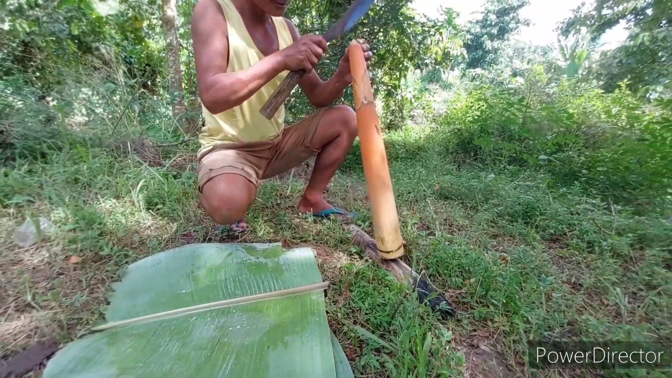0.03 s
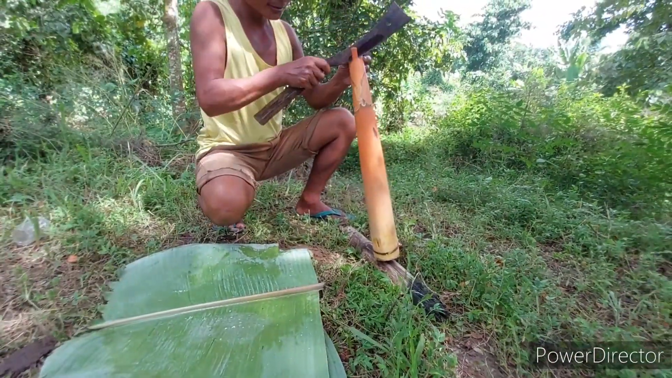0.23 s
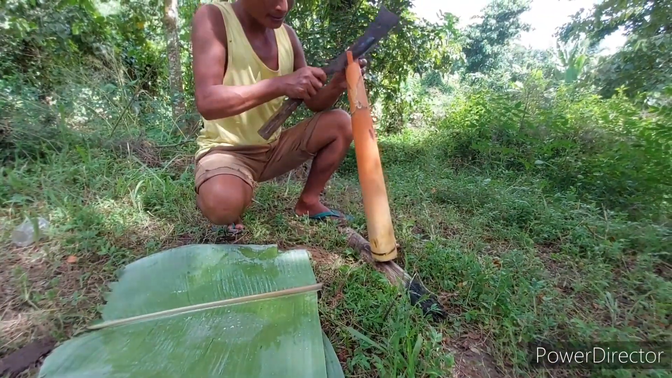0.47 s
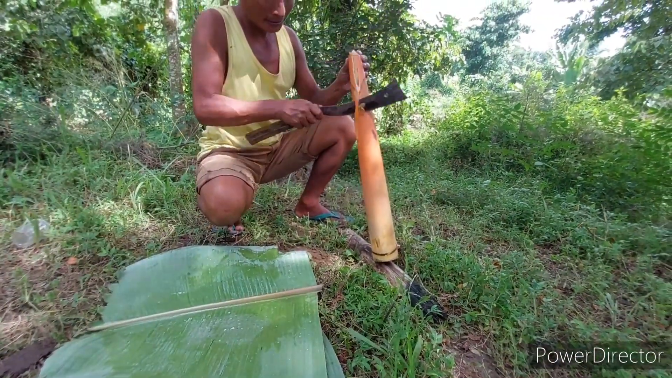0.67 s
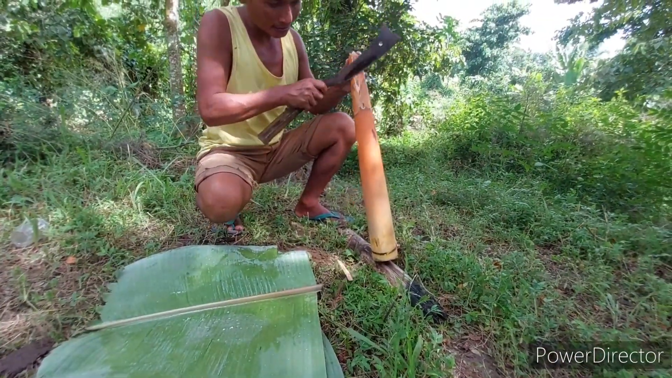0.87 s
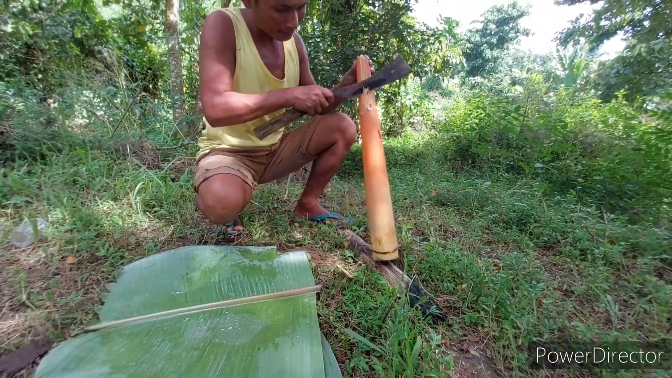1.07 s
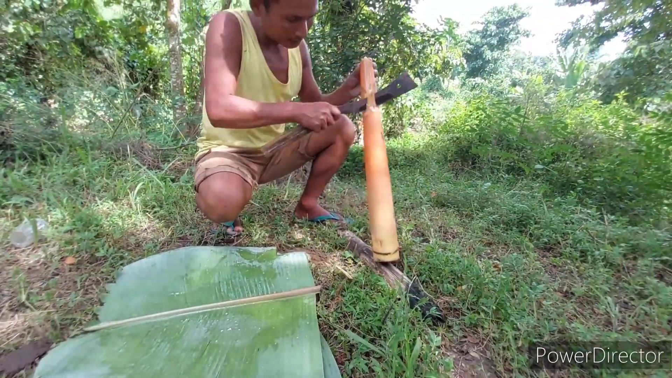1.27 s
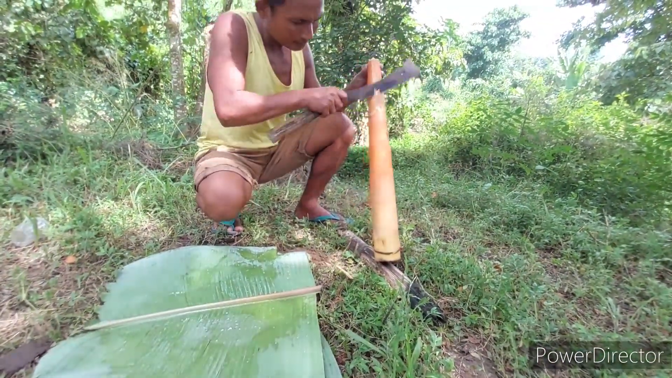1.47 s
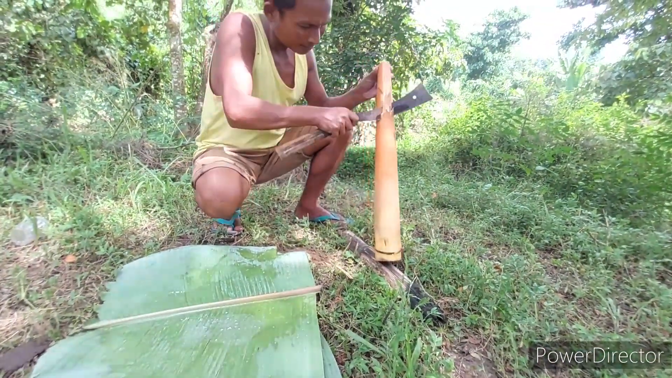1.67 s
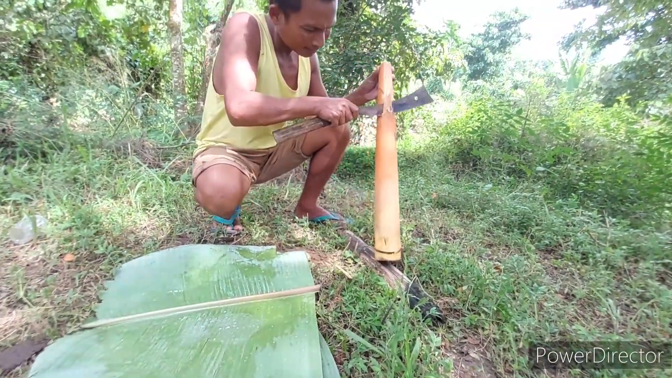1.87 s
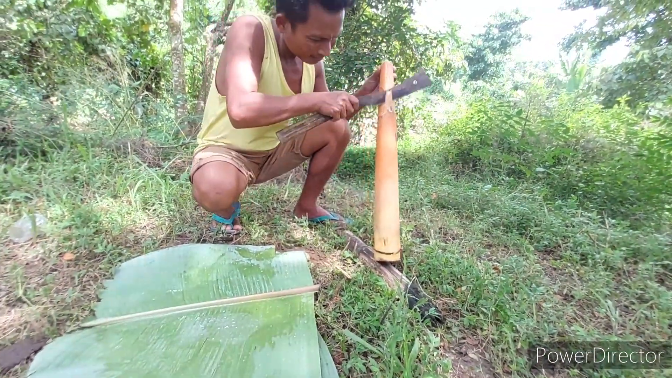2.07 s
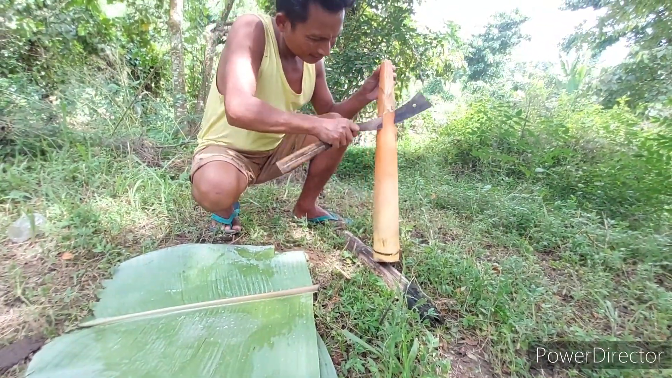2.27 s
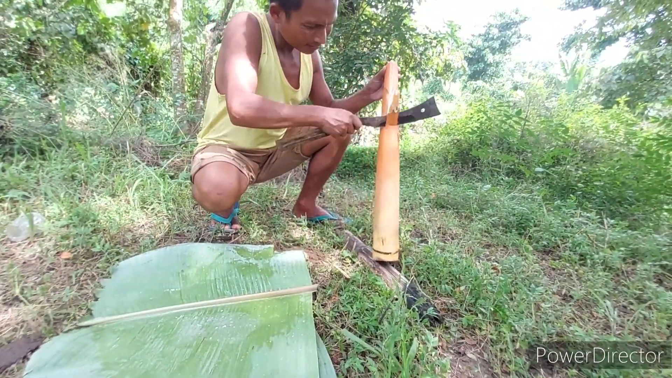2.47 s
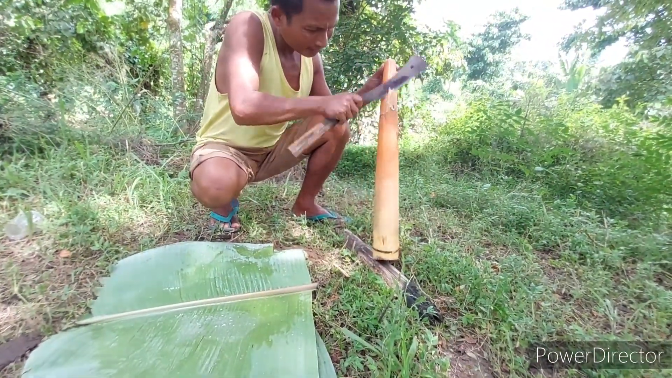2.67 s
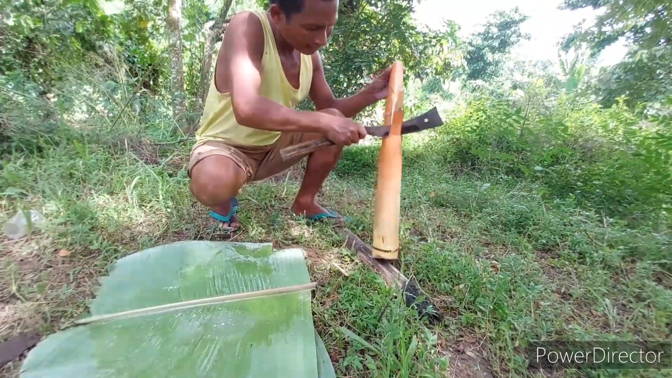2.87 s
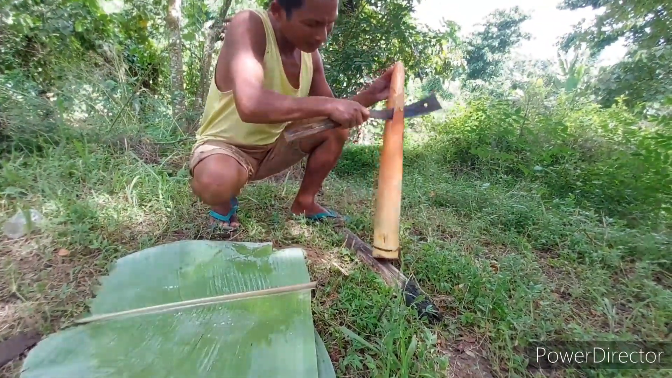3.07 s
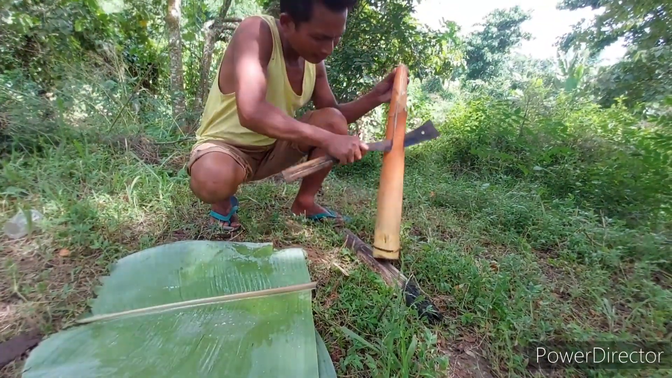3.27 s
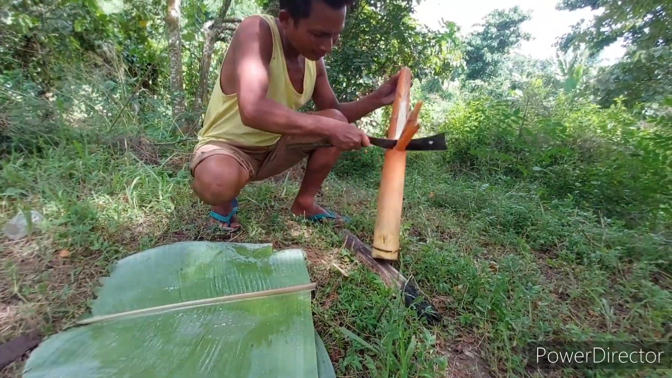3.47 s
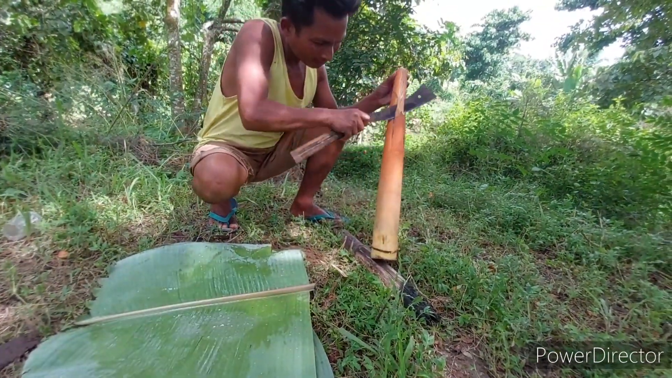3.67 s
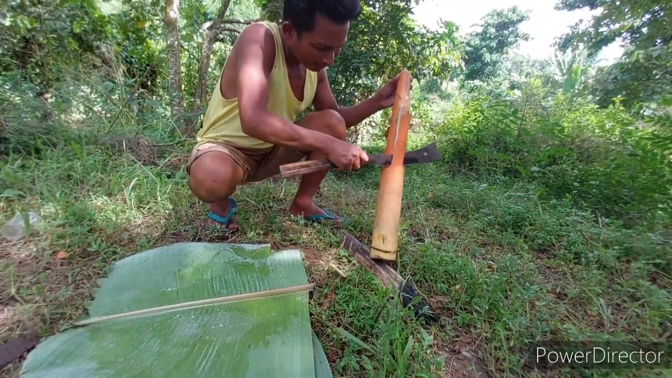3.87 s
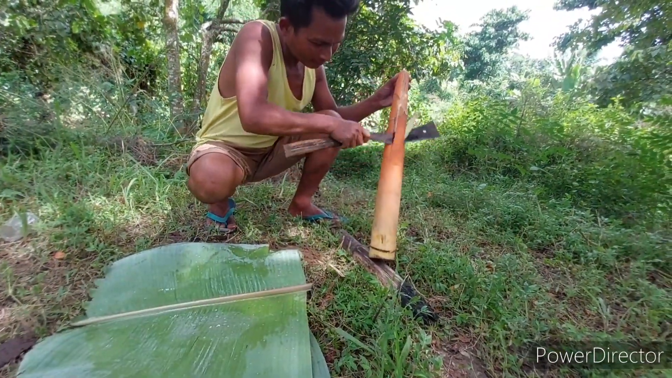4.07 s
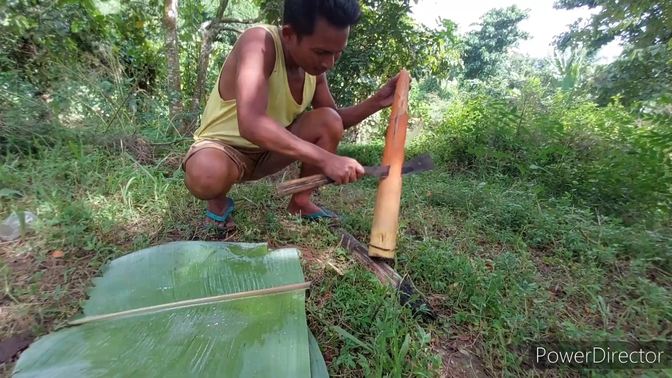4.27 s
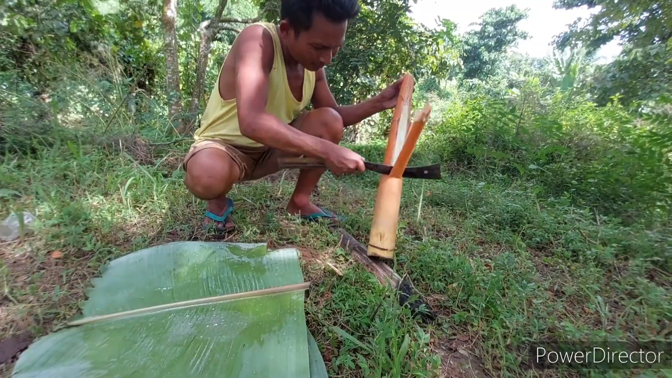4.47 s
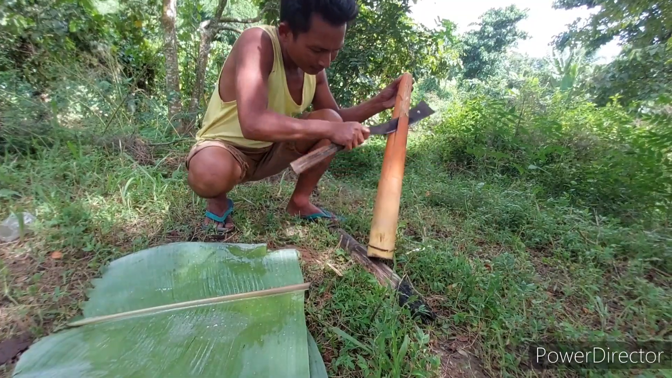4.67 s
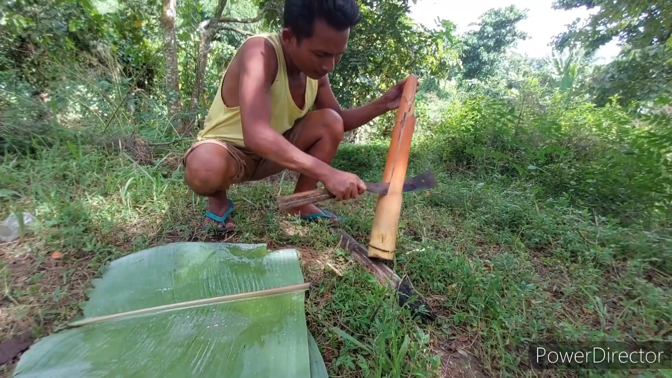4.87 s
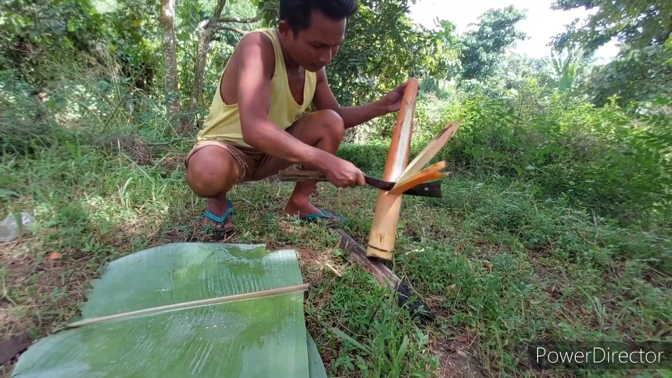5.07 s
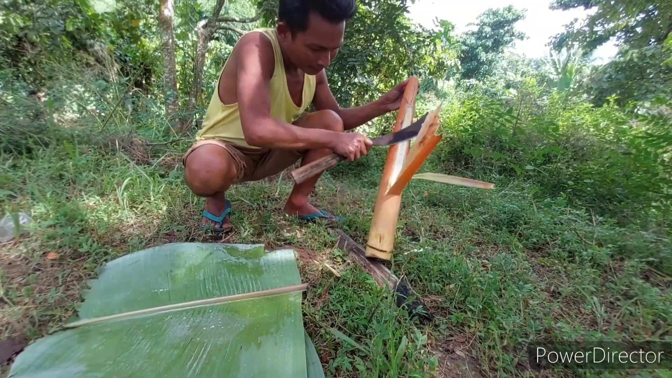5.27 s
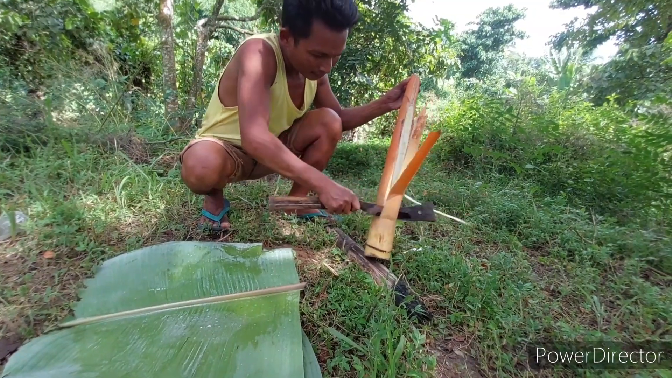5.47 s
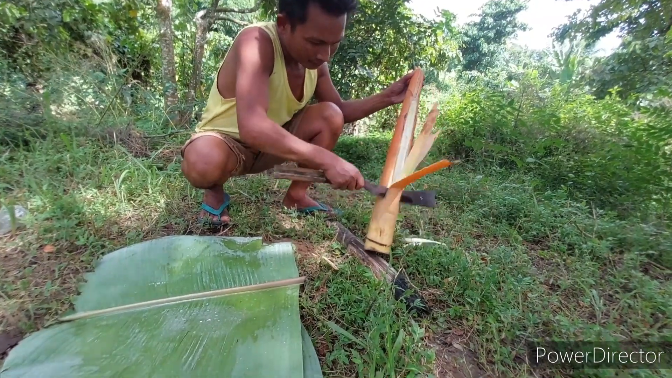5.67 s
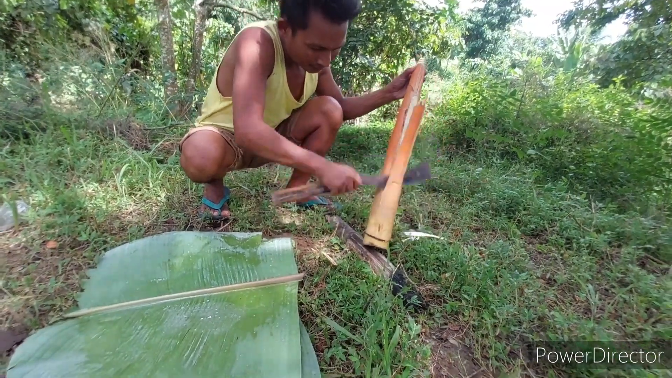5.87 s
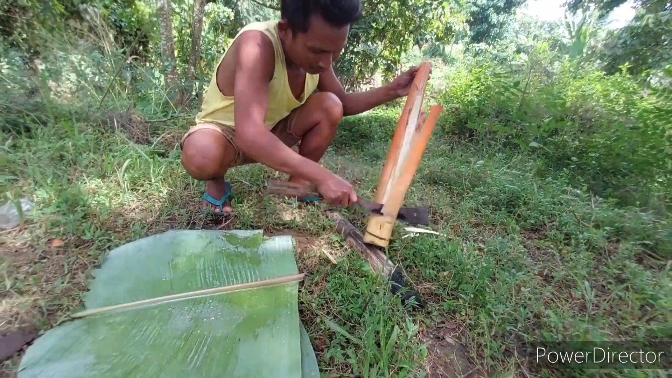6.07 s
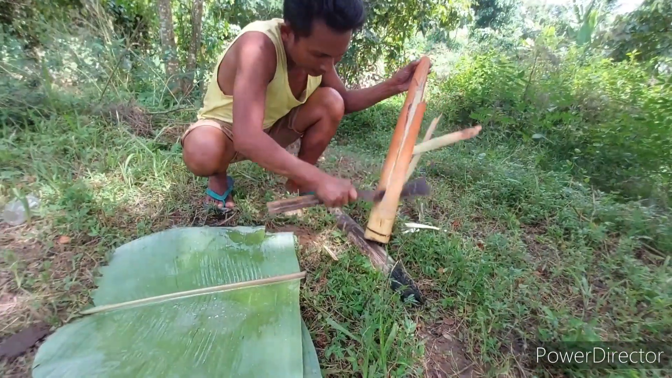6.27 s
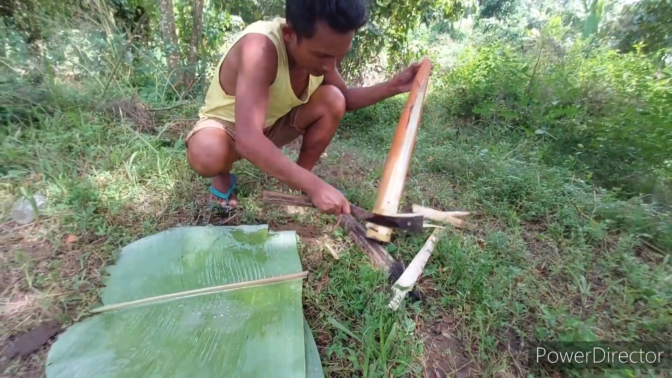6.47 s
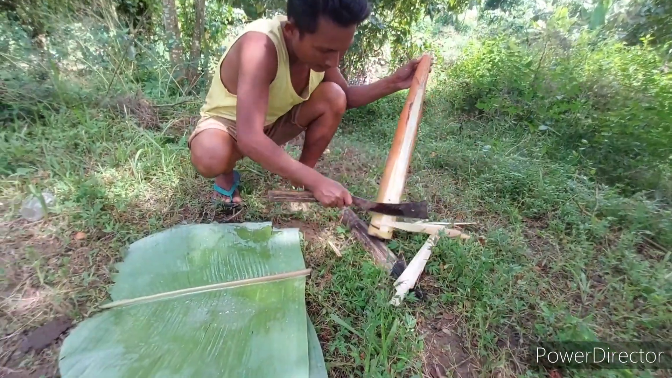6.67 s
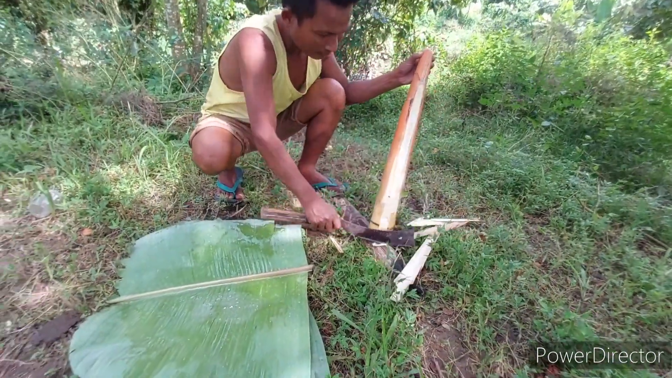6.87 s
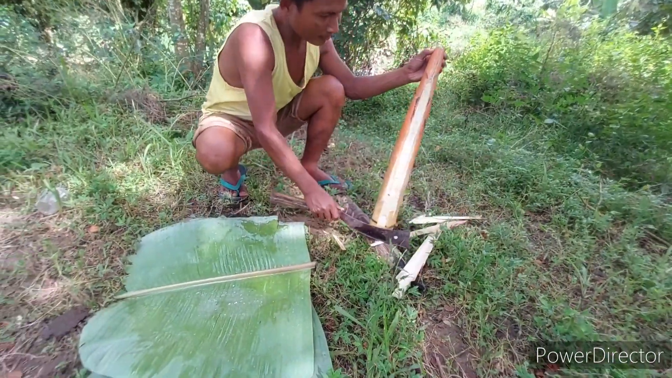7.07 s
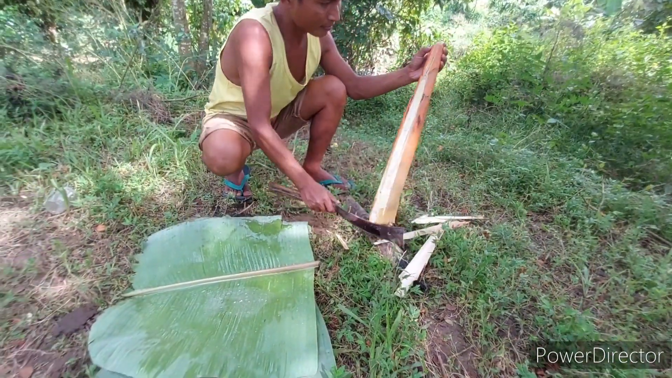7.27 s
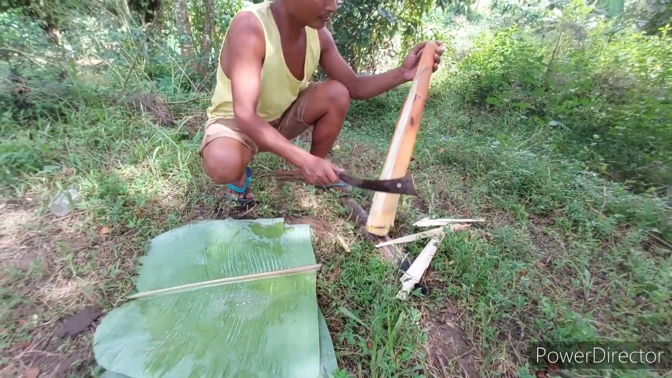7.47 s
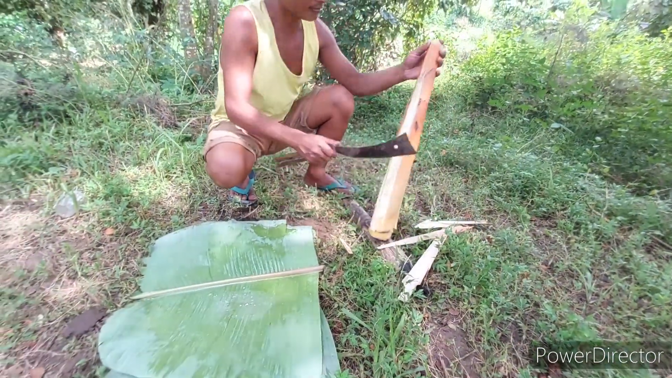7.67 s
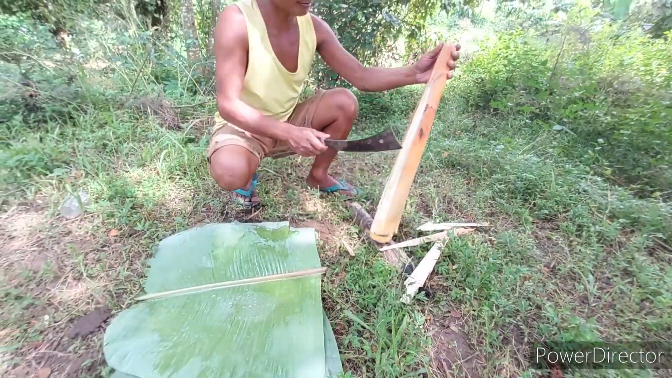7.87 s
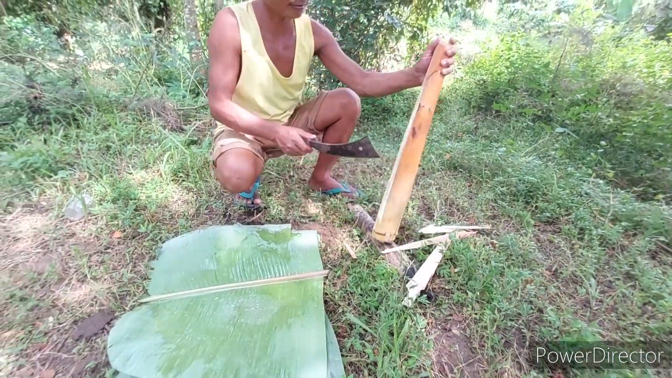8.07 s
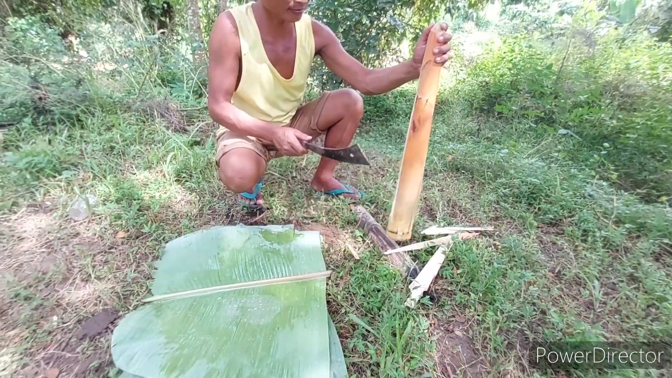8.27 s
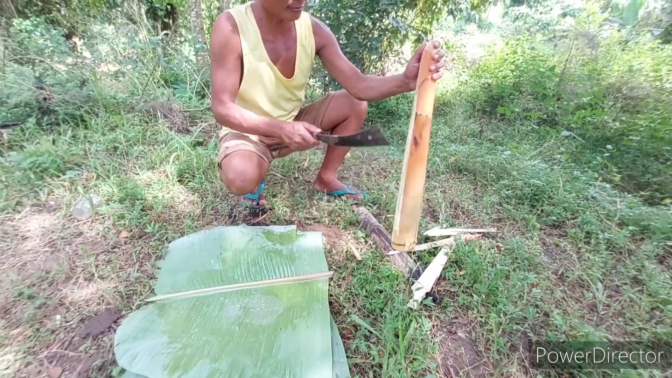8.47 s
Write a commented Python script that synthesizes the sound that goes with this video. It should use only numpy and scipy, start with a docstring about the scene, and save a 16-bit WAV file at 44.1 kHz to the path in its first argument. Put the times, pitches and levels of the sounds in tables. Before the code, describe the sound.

Quick tearing machete strokes shave a plant shoot, husk snapping between them, then two blunt knocks and sparse dry ticks above deep wavering rumble.

```python
"""A machete strips the husk from a raw bamboo shoot at the edge of a wood: grains of noise tear, strip and shoot ring.
Between strokes the blade levers the husk, which crackles in clumped clicks and sharp bursts as it splits.
Twice the blade knocks through at the foot, as a bank of damped sines; dry litter ticks between and after the knocks.
Behind it lie a low booming rumble, leaf hiss and stirred grass in filtered noise, and a few far birds in narrow noise.
Delayed, softened copies give the bounce off the soil, and scattered decaying noise gives the echo of the trees."""
import sys
import numpy as np
from scipy import signal
from scipy.fft import rfft, irfft
from scipy.io import wavfile
from scipy.ndimage import uniform_filter1d

SR = 44100
rng = np.random.default_rng(int(sys.argv[2]) if len(sys.argv) > 2 else 0)


def dump(signal):
    """Clip the signal to [-1, 1] and save it as 16-bit WAV at the path in sys.argv[1]."""
    limited = np.clip(np.atleast_2d(signal).T, -1, 1)
    pcm = np.round(limited * 32767).astype(np.int16)
    wavfile.write(sys.argv[1], SR, pcm)


N = 375291

# Event levels and spectra are relative: each layer sets its own trim, and colour() evens out a spectrum's energy.

# slow swell of the rumble: start_s, deep_level_db (below the split), upper_level_db
RUMBLE_LEVEL = [(0, -40, -41), (.45, -35, -39), (.8, -32.5, -39.5), (1.65, -23.5, -37), (2.05, -25, -38),
                (2.4, -24, -35), (3, -25.5, -33.5), (3.35, -20.5, -35), (4.05, -32.5, -36),
                (4.38, -22, -36), (4.95, -25.5, -40), (5.4, -29.5, -41.5), (6.4, -33, -44.5),
                (7.55, -38.5, -48), (8.25, -30, -47.5), (8.5, -34, -45)]
# the rumble brightens and dulls: start_s, top_level_db (270 to 400 Hz)
RUMBLE_TOP = [(0, -1), (.5, 5), (1.7, -0.5), (3, 0.5), (7.3, -3.5), (7.9, 3)]
# the rumble's hollow boom: start_s, centre_hz, strength_db
BOOM = [(0, 135, 0), (1.2, 130, 3), (1.6, 82, 3), (2.2, 80, 2), (2.9, 126, 4), (4.4, 138, 12),
        (4.95, 97, 14), (5.3, 78, 5), (6.5, 110, 1), (8.5, 128, -3)]
# the breeze in the leaves: start_s, hiss_level_db
HISS_LEVEL = [(0, -51.5), (1, -50), (1.9, -52), (2.75, -49), (3.25, -52), (4.65, -49.5), (5.3, -52),
              (6.8, -52), (8.2, -50)]
# far birds: start_s, length_s, pitch_hz, glide_share (pitch change over the call), level_db
BIRDS = [(0.133, 0.087, 2440, -.03, -54), (1.46, 0.028, 1600, -.02, -60), (7.255, 0.1, 2210, -.04, -55.5),
         (7.39, .1, 6400, 0, -59)]
# echo of the trees: frequency_hz, t60_s
TREE_DECAY = [(200, 0.3), (1000, 0.41), (3000, 0.29), (7000, 0.35), (15000, 0.15)]
# tone of what the trees throw back: frequency_hz, level_db
TREE_RETURNS = [(100, -22.5), (500, -11.5), (900, 1), (1400, -4), (3000, 0.5), (6000, -6), (9000, 2),
                (15000, 3)]
# a knock as it spreads in all directions, its modes blurred: frequency_hz, density_db (per Hz)
KNOCK_SPREAD = [(200, -14), (550, -3.5), (900, -0.5), (1500, -1), (2100, -8), (2800, -11), (6000, -15),
                (12000, -26)]

# tone of each noise: frequency_hz, density_db (per Hz)
RUMBLE_TONE = [(15, -41.5), (30, -32), (48, -3), (70, 5), (95, 4), (130, 3.5), (175, -6.5), (240, -12.5),
               (310, -22.5), (400, -37), (550, -48.5), (900, -67.5), (2000, -83.5)]
HISS_TONE = [(100, 22), (600, 1.5), (1200, -5), (2200, 2), (3000, -1.5), (4400, 4.5), (6000, 3.5),
             (7400, 0.5), (9000, -6.5), (11500, -3.5), (15000, -9), (16500, -4)]
TICK_TONE = [(500, -7), (2000, -14), (4000, -4), (7000, -5.5), (9000, -9.5), (12000, 2.5), (15500, -10.5)]
SNAP_TONE = [(300, -14.5), (1200, -21), (2500, -16), (4000, -6), (6000, 1), (7500, -4), (9000, -15),
             (12000, -6.5), (15500, -12)]
FLESH_TONE = [(150, -16), (550, -10), (850, -10), (1300, -6.5), (2000, 3.5), (3100, 2.5), (4500, -1),
              (8000, -22), (16000, -10)]
HUSK_TONE = [(200, -14.5), (550, -19), (1000, -24.5), (2000, -22.5), (3200, -6.5), (4600, -4), (5800, 2.5),
             (7400, -2.5), (8800, -14.5), (10500, -10.5), (12000, -7), (15000, -11.5), (16500, -24)]

# the shoot at two microphone ports, likeness: frequency_hz, likeness (0 to 1)
LIKENESS = [(300, 0.95), (1500, 0.89), (3000, 0.29), (7000, 0.35), (14000, .55)]
# balance of the ports: frequency_hz, left_minus_right_db
BALANCE = [(500, -1), (2000, -2), (3100, 3), (4000, -4), (4900, 1.5), (5900, -14.5), (7200, -2),
           (9500, -2.5), (12500, 0), (15000, -10)]
# phase by which the left port leads: frequency_hz, lead_rad
LEAD = [(500, 0.5), (2200, 0.86), (3000, -0.4), (4000, -1.7), (5500, -2), (7500, -0.1), (9500, 2.5),
        (12000, 1.5), (15000, 2.5)]
# the highest treble of the cutting brightens and dulls from stroke to stroke: start_s, highest_treble_db
FIZZ = [(.2, -2.5), (1.1, 2.5), (2.4, -1), (3.3, 2), (5.1, -1.5), (5.5, 4.5), (6.5, 4.5)]

# husk and dry stalks ticking on the ground: start_s, level_db
TICKS = [(6.7523, -41.5), (7.136, -43), (7.508, -32), (7.5177, -39.5), (8.0382, -38.5), (8.2721, -35.5),
         (8.3917, -38.5)]
# single snaps of the husk, strong and weak: start_s, level_db
SNAPS = [(1.5675, -36), (2.5265, -19.5), (3.0669, -32), (3.5842, -22), (4.057, -17.5), (4.0739, -24),
         (4.1995, -30), (4.6617, -27.5), (5.1232, -23), (5.2051, -31.5), (6.0614, -16.5)]
# the husk levered open: start_s, length_s, level_db
PRIES = [(2.538, .042, -44.5), (3, .085, -40), (3.515, 0.077, -39.5), (4.046, 0.06, -37.5),
         (4.135, .013, -37), (4.541, .074, -38.5), (5.088, .095, -40.5), (6.325, .04, -54)]
# the blade stops at the foot of the shoot: start_s, level_db, dull_hz (modes weaken above it),
# weight_db (for modes below 1200 Hz), favoured_hz (modes favoured by the spot struck), favour_db
KNOCKS = [(6.4824, -5.5, 2670, -1, 1124, 9), (6.9785, -12.5, 2450, -2, 1480, 6.5)]
# modes of shoot and block: frequency_hz, level_db, t60_s
SHOOT_MODES = [(150, -18, .04), (292, -9, 0.023), (441, -11.5, 0.077), (607, -1.5, 0.036), (930, -3, 0.029),
               (1143, -10.5, 0.017), (1220, -5, .02), (1464, -5, 0.011), (1780, -7.5, .024),
               (2010, -14, .024), (2670, -18, .018), (3360, -21, .018), (3780, -17, 0.031)]
# the last stroke wedges on through the woody foot: start_s, length_s, level_db
WEDGE = (6.453, .032, -33.5)
# what groans in the foot: frequency_hz, width_hz, level_db
FOOT = [(540, 400, -.5), (900, 400, -2)]
# the shoot thuds at its tip and hard foot, hardly in the soft middle: start_s, level_db (relative to the stroke)
THUD = [(.2, -20), (2.9, -37), (5.3, -28.5), (6.45, -4)]
# strokes of the blade: start_s, bite_s, cut_s, level_db, change_db (while cutting), deep_db (into the flesh),
# strip_hz (ring of the loose strip)
STROKES = [(.218, .003, 0.042, -24.5, -19, -4.5, 1240), (.614, .034, .051, -23, -6, -11, 1650),
           (.719, .02, .011, -22, -12.5, -2, 1660), (1.029, .011, .035, -38, 12.5, -2.5, 1750),
           (1.383, .005, .024, -18.5, -4, -15, 1680), (1.746, .006, 0.011, -21, -1, -9, 1740),
           (2.113, .04, 0.0092, -41.5, -5, -4.5, 1700), (2.368, .005, 0.021, -22, -8.5, -6, 1630),
           (2.521, .004, 0.036, -34, -3.5, -5, 1690), (2.869, .005, .012, -20, -2, -8, 1300),
           (3.375, .003, 0.028, -18, -9.5, -8, 1300), (3.878, .005, .014, -20, -1, -5, 1240),
           (4.376, .003, 0.011, -18.5, 0.5, -6.5, 1230), (4.769, .002, 0.0036, -27, -1.5, 1, 2230),
           (4.922, .005, 0.016, -17.5, -2, -1.5, 1380), (5.508, .014, 0.032, -21.5, -2, 0, 1230),
           (5.631, .002, 0.0016, -26, -3, 1.5, 1340), (6.047, .006, 0.013, -24, -2, 3, 1940),
           (6.446, .002, .004, -22, -14, 14.5, 2195)]

EDGE_HZ = 15750
# the grass is stirred once the shoot is lifted and turned
LIFT_S, STILL_GRASS_DB, STIRRED_GRASS_DB = 6.5, -68.5, -59
# fibres break one after another under the lever: mean wait, level over the prying, scatter
SNAP_EVERY_S, SNAP_OVER_DB, SNAP_SCATTER_DB = .012, 8.5, 3
RUN_OUT_S = .016  # the edge leaves the cut in two ramps of this length
# rub of the blade, rising to the bite: final level relative to the stroke, speed of the rise
SLIDE_DB, SLIDE_RISE_DB_PER_S = -22.5, 430.5
FULL_SWING_S, SPLIT_OPEN_S = .4, 2.6  # the rub needs time for a swing, and a split that has opened
STRIP_DB, STRIP_DB_PER_DB = -18.5, 1.0  # the loose strip rings more, the deeper the cut


def amp(db):
    """Decibels to amplitude."""
    return 10 ** (np.asarray(db) / 20)


def evened(x):
    """A signal scaled to rms 1."""
    return x / np.sqrt(np.mean(x ** 2) + 1e-20)


def read(points, hz):
    """A table of frequency_hz, value, read on a log-frequency axis."""
    f, value = np.transpose(points)
    return np.interp(np.log(hz + 1), np.log(f + 1), value)


def along(curve):
    """The columns of a table of start_s, value, .. at every sample."""
    s, *columns = np.transpose(curve)
    return np.array([np.interp(np.arange(N) / SR, s, column) for column in columns])


def add(mix, s, sound):
    """Lays a sound into the mix at s seconds."""
    part = mix[max(round(s * SR), 0):][:len(sound)]
    part += sound[:len(part)]


def colour(x, spectrum, size=8192):
    """A causal minimum-phase filter of unit energy, shaped like the given spectrum."""
    log_gain = np.log(amp(read(spectrum, abs(np.fft.fftfreq(size, 1 / SR)))))
    minimum_phase = np.exp(np.conj(signal.hilbert(log_gain)))
    taps = np.fft.ifft(minimum_phase).real[:size // 2]
    return signal.oaconvolve(x, taps[None] / np.linalg.norm(taps), axes=1)[:, :N]


def below(x, hz, order=8):
    """The part of a sound under hz, without phase shift."""
    return irfft(rfft(x) / (1 + (np.fft.rfftfreq(N, 1 / SR) / hz) ** order), N)


def drift(rate_hz):
    """Random wandering of rms 1 that is slower than about rate_hz."""
    return evened(below(rng.standard_normal(N), rate_hz, order=4))


def grains(per_s, spread_db):
    """Random clicks of uneven size: two versions share moments and sizes but not signs."""
    size = amp(spread_db * np.minimum(rng.exponential(1, N), 4))
    struck = rng.random(N) < per_s / SR
    return evened(size * struck * rng.choice([-1., 1.], (2, N)))


def resonate(x, hz, width_hz):
    """A resonance of gain 1 that can follow a pitch curve."""
    turn = np.exp(2j * np.pi * np.cumsum(hz * np.ones(x.shape[-1])) / SR)
    r = np.exp(-np.pi * width_hz / SR)
    # turn the pitch down to zero, smooth, and turn it back up
    smooth = signal.lfilter([1 - r], [1, -r], x / turn + 1e-18)
    return 2 * (turn * smooth).real


def ringing(force, hz, width_hz):
    """A doubled resonance shaken by a rough force, with the energy of that force."""
    rough = force * rng.standard_normal(len(force))
    ring = resonate(resonate(rough, hz, width_hz), hz, width_hz)
    return ring * np.linalg.norm(force) / np.linalg.norm(ring)


def rumble(low_db=-.3, high_db=4, split_hz=170, top_hz=270, edge_hz=400, side_db=-21,
           boom_width_hz=28, gust_db=1.3, gust_hz=6, high_gust_db=1.4):
    """A low, nearly mono rumble with a wandering boom; its deep and upper parts swell and gust separately."""
    low, high = along(RUMBLE_LEVEL)
    centre_hz, boom_db = along(BOOM)
    noise = colour(rng.standard_normal((2, N)), RUMBLE_TONE)
    deep = below(noise, split_hz)
    top = below(noise, edge_hz, order=12) - below(noise, top_hz)
    boom = deep + amp(boom_db) * resonate(deep, centre_hz, boom_width_hz)
    # level out the deep part over about 90 ms, so that the swell alone shapes it
    steady = boom / np.sqrt(uniform_filter1d(boom ** 2, size=4000) + 1e-12)
    upper = evened(noise - deep + top * (amp(along(RUMBLE_TOP)) - 1))
    deep_swell = amp(low + low_db + gust_db * drift(gust_hz))
    upper_swell = amp(high + high_db + high_gust_db * drift(gust_hz))
    mid, side = steady * deep_swell + upper * upper_swell
    return np.array([mid + amp(side_db) * side, mid - amp(side_db) * side])


def leaves(hiss_db=-.4, waver_db=1.7, stir_s=0.22):
    """Foliage hisses as wavering noise; grass crackles in clumps, more once the shoot is lifted and turned."""
    hiss_level = amp(along(HISS_LEVEL) + hiss_db + waver_db * drift(rate_hz=12))
    hiss = colour(rng.standard_normal((2, N)), HISS_TONE) * hiss_level
    clumps = evened(amp(4 * drift(rate_hz=14)))
    blades = grains(per_s=300, spread_db=3) * clumps
    stirred = along([(LIFT_S - stir_s, STILL_GRASS_DB), (LIFT_S, STIRRED_GRASS_DB)])
    return hiss + colour(blades * amp(stirred), TICK_TONE)


def birds(level_db=-7):
    """Faint calls from the wood, blurred by distance into narrow noise around a gliding pitch."""
    out = np.zeros(N)
    for s, length, hz, glide, db in BIRDS:
        u = np.linspace(0, 1, int(length * SR))
        call = amp(db + level_db) * np.sin(np.pi * u)
        add(out, s, ringing(call, hz * (1 + glide * (u - .5)), width_hz=420))
    return np.array([out, out])


def trees(x):
    """Scattered returns from trunks and leaves, each band dying at its own speed."""
    size = (2, SR // 2)
    taps = rng.standard_normal(size) * (rng.random(size) < .1)
    hz, t, z = signal.stft(taps, SR, nperseg=256)
    fade = amp(-60 * t / read(TREE_DECAY, hz)[:, None])
    fade_in = np.minimum(t / 0.011, 1)
    tail = signal.istft(z * fade * fade_in, SR, nperseg=256)[1]
    return signal.fftconvolve(x, tail / np.linalg.norm(tail[0]), axes=1)[:, :N]


def spreading(level_db=-4, second_knock_db=-2.5):
    """The knocks on their way out to the trees; the second, softer knock sends less out to them."""
    out = np.zeros(N)
    for k, (s, db, *_) in enumerate(KNOCKS):
        add(out, s, amp([db + level_db + k * second_knock_db]))
    return colour(np.array([out, out]), KNOCK_SPREAD)


def fizzing(x, above_hz=8800):
    """The highest treble of the cutting brightens and dulls from stroke to stroke."""
    body = below(x, above_hz, order=12)
    return body + (x - body) * amp(along(FIZZ))


def ground(x, first_s=.0036, last_s=0.002603, soft_hz=5000):
    """A bounce off the soil, sooner as the blade works down the shoot; grass softens its treble."""
    n = np.arange(N)
    delay = SR * np.linspace(first_s, last_s, N)
    late = np.array([np.interp(n - delay, n, side) for side in x])
    bounce = irfft(rfft(late) / (1 + 1j * np.fft.rfftfreq(N, 1 / SR) / soft_hz), N)
    return x + amp(-6) * bounce


def ports(pair):
    """Blends two signals by frequency into the partly alike sound at two microphone ports."""
    hz = np.fft.rfftfreq(N, 1 / SR)
    a, b = rfft(pair)
    same = np.clip(read(LIKENESS, hz), 0, 1)
    lean = amp(read(BALANCE, hz))
    left = (same * a + np.sqrt(1 - same ** 2) * b) * np.exp(1j * read(LEAD, hz)) * lean
    return irfft(np.array([left, a]) * np.sqrt(2 / (1 + lean ** 2)), N)


def snaps(rows, spectrum, level_db, crack_s, splinter_db, splinter_s):
    """A sharp break followed by a few milliseconds of splinters, as noise with two decays."""
    t, out = np.arange(SR // 40) / SR, np.zeros((2, N))
    shape = np.exp(-t / crack_s) + amp(splinter_db) * np.exp(-t / splinter_s)
    for s, db in rows:
        for side in out:
            burst = shape * rng.standard_normal(len(t))
            add(side, s, amp(db + level_db) * burst / np.linalg.norm(burst))
    return colour(out, spectrum)


def breaking(count=12, first_db=3):
    """Each levering starts with a snap, and more follow at uneven intervals: rows of start_s, level_db."""
    rows = []
    for s, length, db in PRIES:
        waits = np.cumsum(SNAP_EVERY_S * 2 * rng.random(count))
        sizes = db + SNAP_OVER_DB + SNAP_SCATTER_DB * rng.standard_normal(count)
        rows.append((s, db + SNAP_OVER_DB + first_db))
        rows += [(s + wait, size) for wait, size in zip(waits, sizes) if wait < length]
    return rows


def prying(flesh_db=-10):
    """Small fibres give way in clumps as the husk bends outward."""
    strain = np.zeros(N)
    for s, length, db in PRIES:
        add(strain, s, amp(db) * signal.windows.tukey(int(length * SR), .5))
    clumps = evened(amp(3.5 * drift(rate_hz=180)))
    fibres = grains(per_s=2600, spread_db=2.5) * clumps * strain
    return colour(fibres, SNAP_TONE) + amp(flesh_db) * colour(fibres, FLESH_TONE)


def knocks(click_gain=.0889, click_s=.0028, spot_width_hz=150):
    """The blow rings the damped modes of shoot and block, with a short crunch at the contact."""
    t, out = np.arange(SR // 8) / SR, np.zeros(N)
    for s, db, dull_hz, weight_db, favoured_hz, favour_db in KNOCKS:
        ring = click_gain * np.exp(-t / click_s) * rng.standard_normal(len(t))
        for k, (hz, mode_db, t60) in enumerate(SHOOT_MODES):
            spot_db = favour_db * np.exp(-((hz - favoured_hz) / spot_width_hz) ** 2)
            dulling = np.sqrt(1 + (hz / dull_hz) ** 4)
            share = amp(mode_db + spot_db + weight_db * (hz < 1200)) / dulling
            # neighbouring modes start in opposite directions
            ring += (-1) ** k * share * amp(-60 * t / t60) * np.sin(2 * np.pi * hz * t)
        add(out, s, amp(db) * ring)
    return np.array([out, out])


def wedging(husk_db=-4, flesh_db=-7):
    """The last stroke grinds on through the hard foot: torn fibres over groaning resonances."""
    s, length, db = WEDGE
    force = np.zeros(N)
    add(force, s, amp(db) * signal.windows.tukey(int(length * SR), .6))
    fibres = grains(per_s=4600, spread_db=1.5) * force
    groan = sum(amp(mode_db) * ringing(force, hz, width) for hz, width, mode_db in FOOT)
    return groan + amp(husk_db) * colour(fibres, HUSK_TONE) + amp(flesh_db) * colour(fibres, FLESH_TONE)


def strokes(husk_db=-1.0, flesh_db=-7, uneven_db=1.3, strip_width_hz=340, overtone=2.5, overtone_db=-4,
            thud_hz=540, thud_width_hz=400, wet_slide_db=-2):
    """The edge tears thousands of fibres a second, in bunches; deeper cuts add darker flesh, and strip and shoot ring."""
    t = np.arange(SR // 4) / SR
    husk, flesh, slide, wood = np.zeros((4, N))
    last_s = 0
    for s, bite, cut, db, change_db, deep_db, strip_hz in STROKES:
        # bite in, cut, then leave the cut
        corners = np.cumsum([0, bite, cut, RUN_OUT_S, RUN_OUT_S])
        contour_db = np.interp(t, corners, [-22, 0, change_db, change_db - 27.0, -70])
        force = amp(db + contour_db) * (t < corners[-1])
        add(husk, s, force)
        add(flesh, s, force * amp(deep_db))

        strip = ringing(force, strip_hz, strip_width_hz)
        strip += amp(overtone_db) * ringing(force, strip_hz * overtone, strip_width_hz)
        thud = ringing(force, thud_hz, thud_width_hz)
        thud_db = np.interp(s, *np.transpose(THUD))
        add(wood, s, amp(STRIP_DB + STRIP_DB_PER_DB * deep_db) * strip + amp(thud_db) * thud)

        # before the bite, the blade rubs down the open split
        reach = min((s - last_s) / FULL_SWING_S, 1) * min(s / SPLIT_OPEN_S, 1)
        approach = reach * amp(db + SLIDE_DB - SLIDE_RISE_DB_PER_S * t[:SR // 10])[::-1]
        rub_start = s - len(approach) / SR
        add(slide, rub_start, approach)
        add(flesh, rub_start, approach * amp(deep_db + wet_slide_db))
        last_s = s
    bunches = evened(amp(uneven_db * drift(rate_hz=500)))
    tearing = colour(grains(per_s=8200, spread_db=2.0) * husk * bunches, HUSK_TONE) * amp(husk_db)
    crunch = colour(grains(per_s=2100, spread_db=0.5) * flesh * bunches, FLESH_TONE) * amp(flesh_db)
    rub = colour(rng.standard_normal((2, N)) * slide, HUSK_TONE)
    return tearing + crunch + wood + rub


def scene():
    """The shoot close by, with its knocks and echo, over litter, far birds, leaves and rumble."""
    background = rumble() + leaves()
    far = birds()
    litter = snaps(TICKS, TICK_TONE, level_db=19, crack_s=.0002, splinter_db=-15.0, splinter_s=0.0034)
    cracks = snaps(SNAPS + breaking(), SNAP_TONE, level_db=16.5,
                   crack_s=.0007, splinter_db=-9.5, splinter_s=.0026)
    cutting = strokes() + wedging() + prying()
    near = ports(ground(fizzing(cutting + cracks))) + litter
    echo = trees(colour(amp(-13.5) * near + amp(3) * far, TREE_RETURNS) + spreading())
    return near + knocks() + far + echo + background


def record(dry):
    """The band limit of the recorder: a steep low-pass at the top of the treble."""
    taps = signal.firwin(301, EDGE_HZ, window=("kaiser", 9), fs=SR)
    return signal.oaconvolve(dry, taps[None], "same")


dry = scene()
out = record(dry)
dump(out)
```